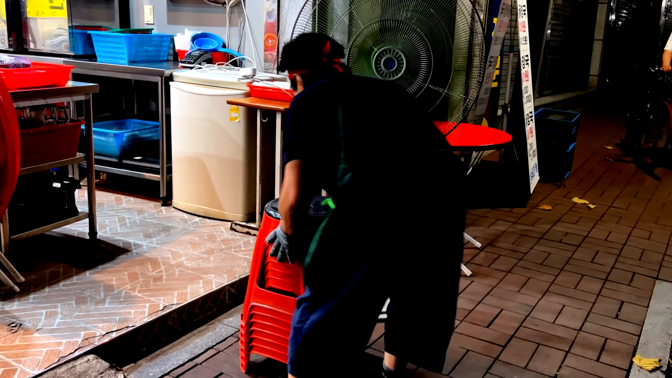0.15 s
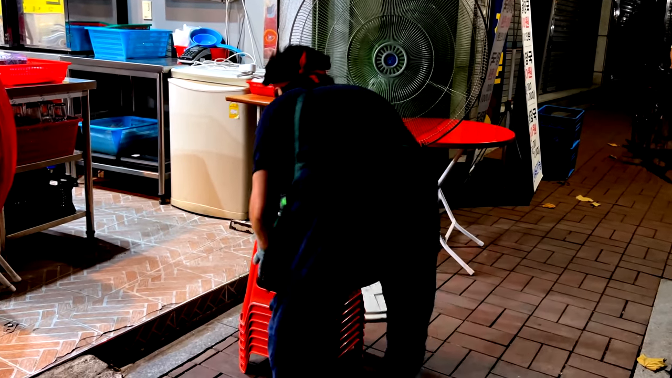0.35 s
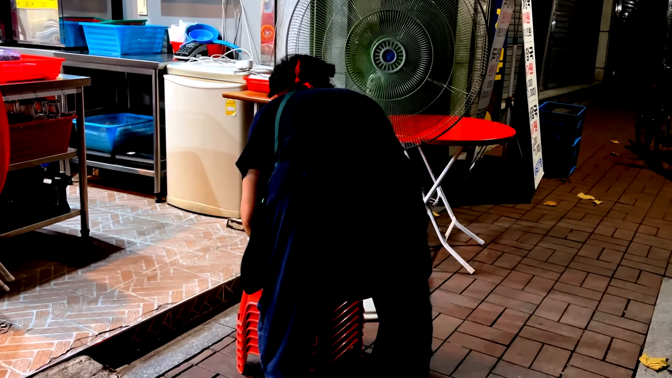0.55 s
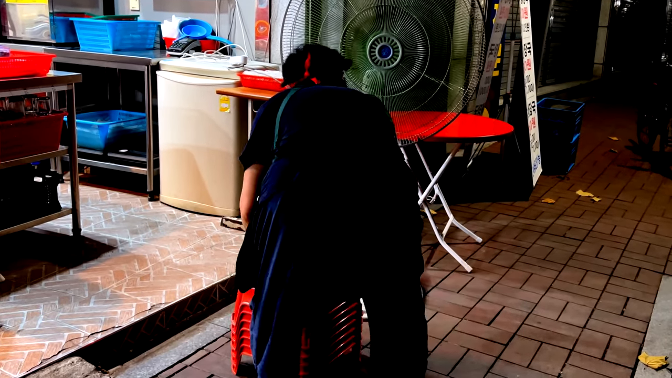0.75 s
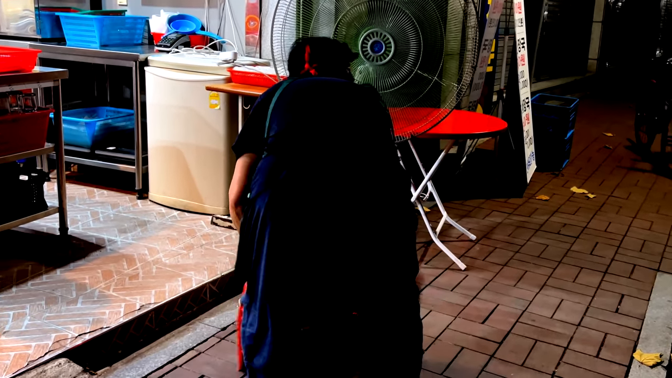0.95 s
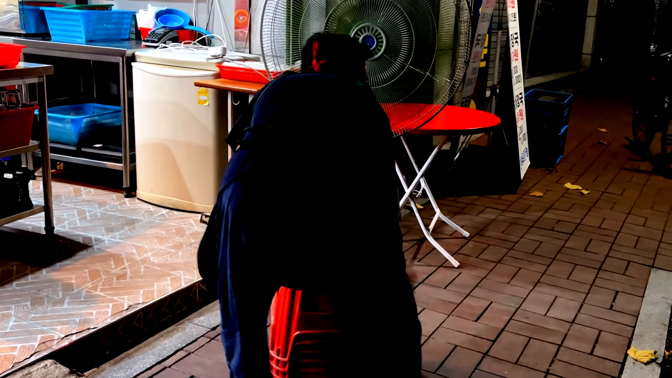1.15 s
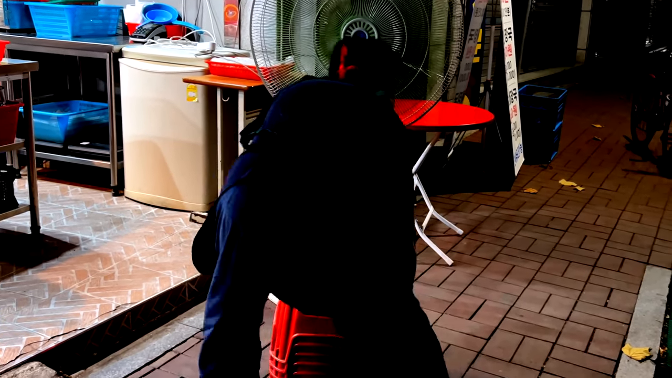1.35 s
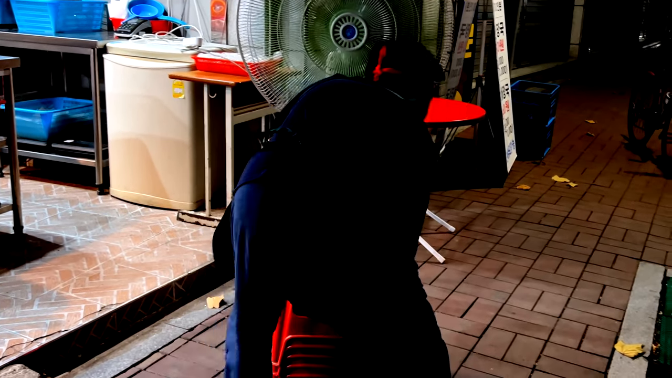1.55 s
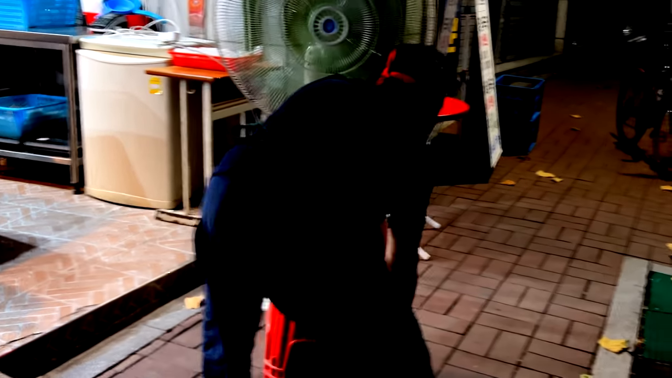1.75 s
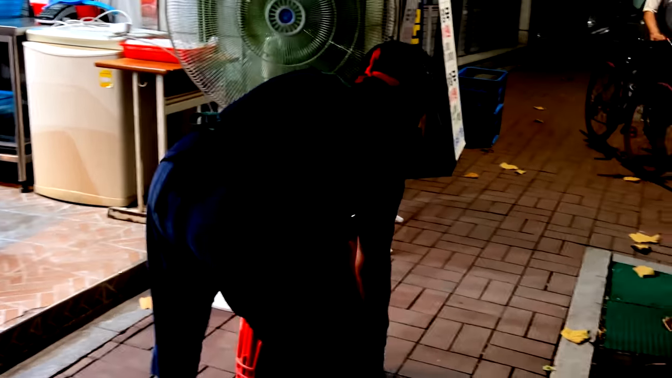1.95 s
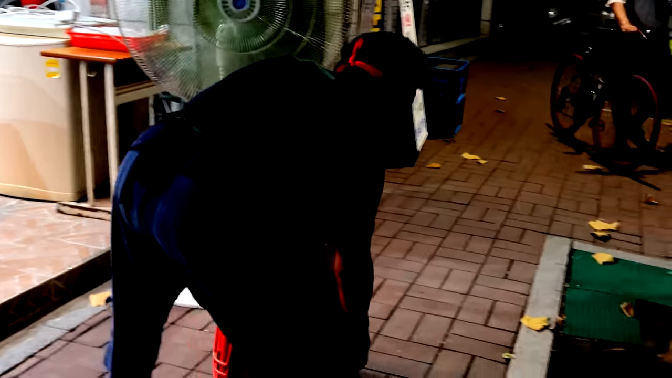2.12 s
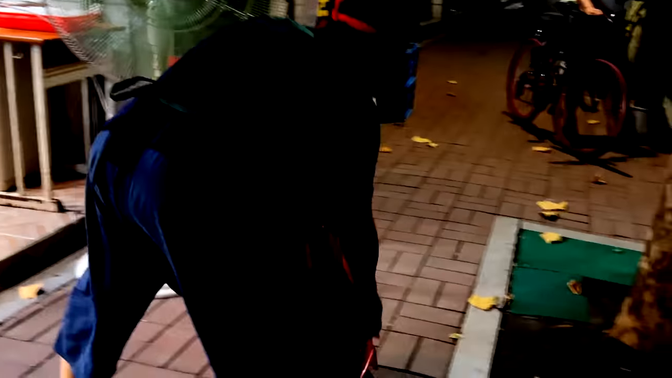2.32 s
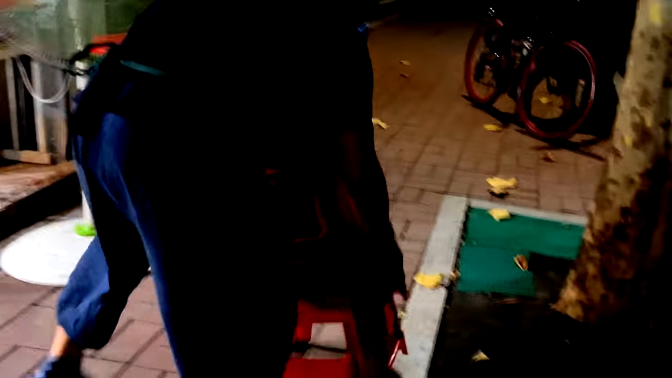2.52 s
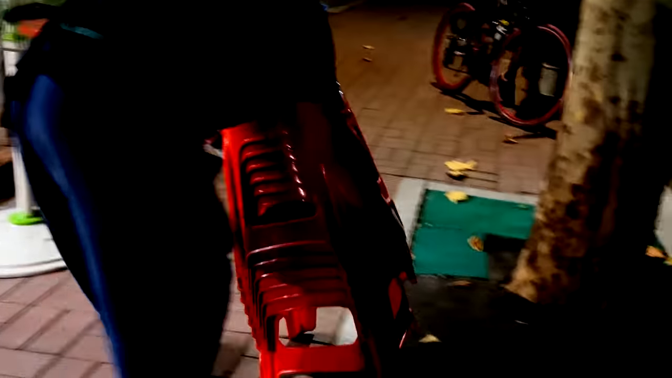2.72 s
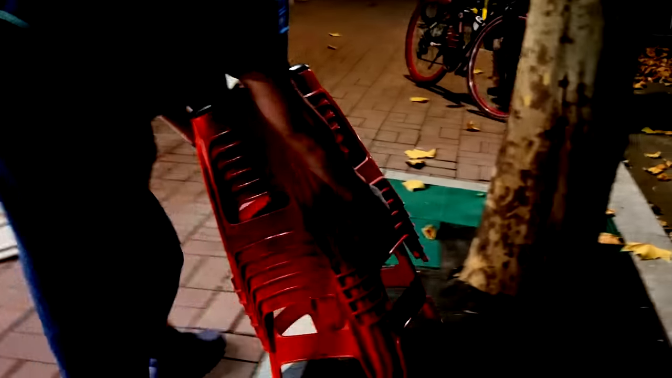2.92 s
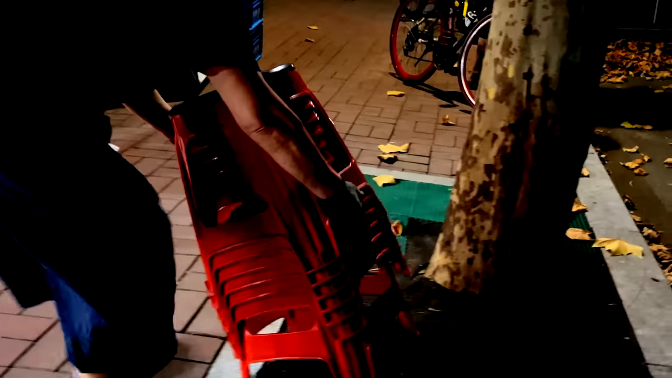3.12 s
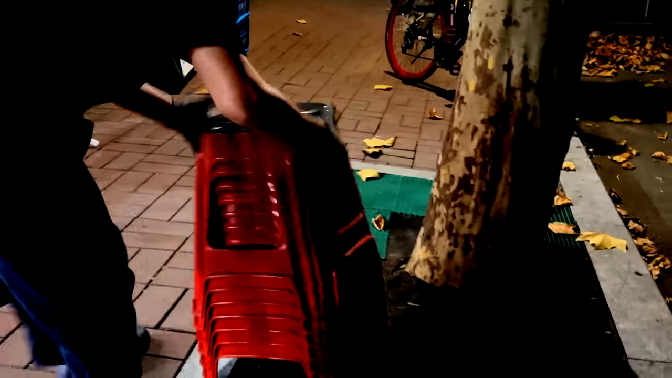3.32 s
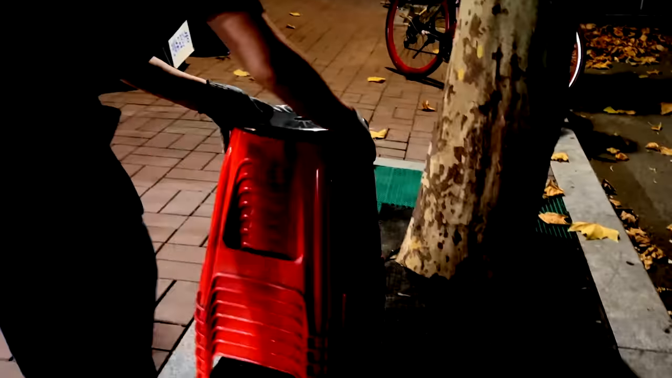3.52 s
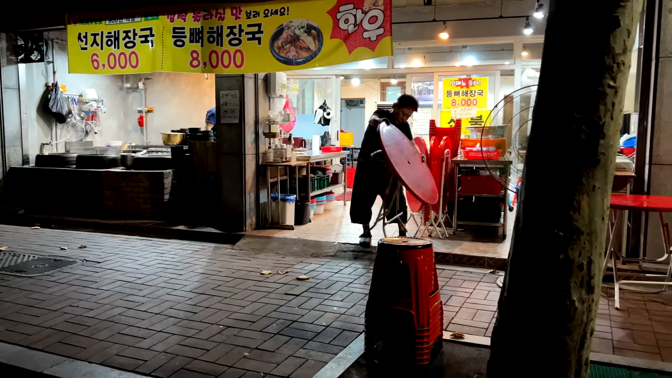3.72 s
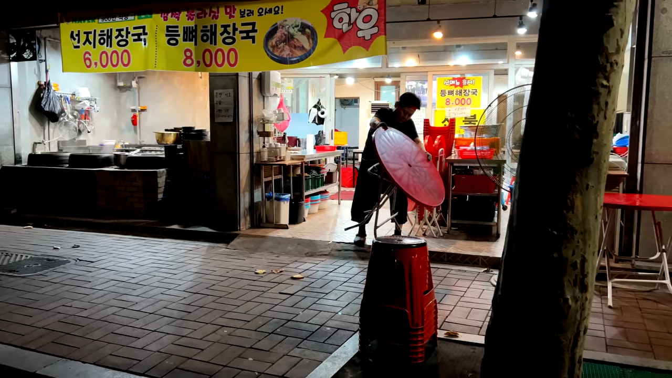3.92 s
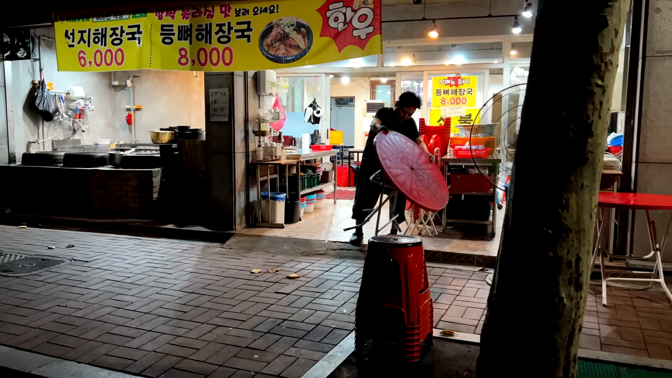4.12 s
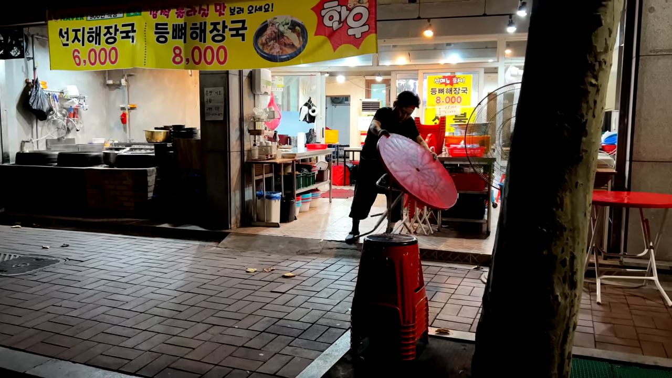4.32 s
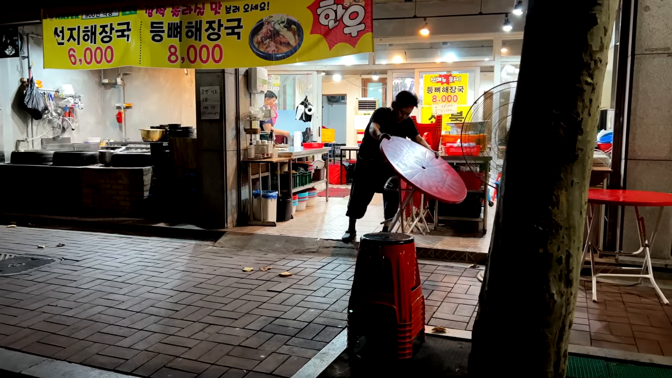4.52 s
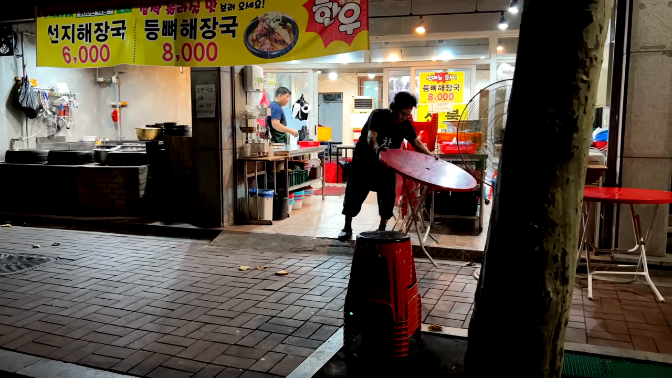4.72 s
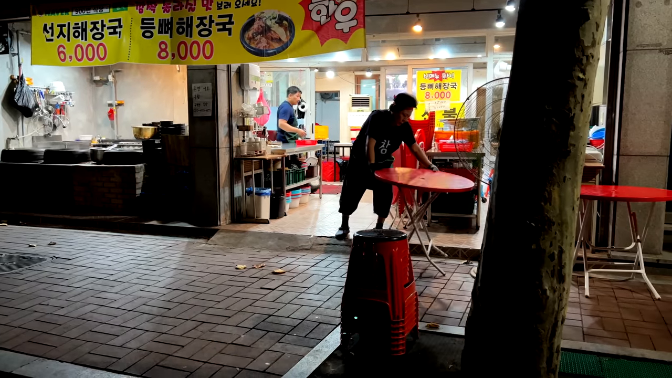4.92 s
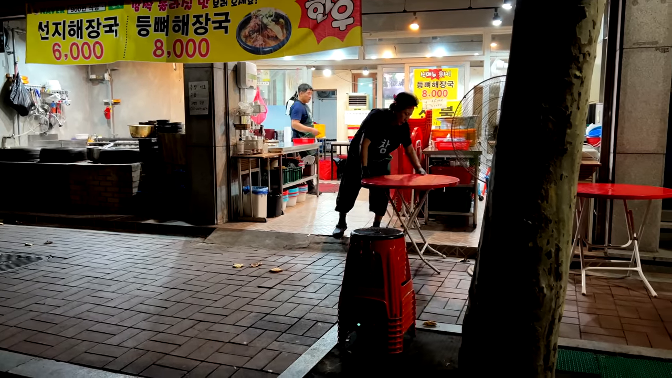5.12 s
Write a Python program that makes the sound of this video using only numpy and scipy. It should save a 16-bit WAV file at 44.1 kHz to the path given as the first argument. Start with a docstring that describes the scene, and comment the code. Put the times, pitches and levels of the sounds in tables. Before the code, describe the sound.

Plastic stools judder and knock close by amid wind thumps and fan hum, followed by a short metallic clash of table legs.

```python
"""A stack of plastic stools close on the left is dragged over brick paving outside a street kitchen:
stick-slip noise scrapes and groans, struck modes rattle, and the stack is set down hard.
A bright scuff comes near 0.46 s, then steel legs of a folding table clash as they open in the shop front:
noise bands and modes. Behind them fans hum as wavering sines and traffic murmurs as coloured noise;
puffs of wind, lumpy low noise and sinking thumps, overload the small stereo microphone."""
import sys
import numpy as np
from scipy import signal
from scipy.fft import rfft, irfft, next_fast_len
from scipy.io import wavfile
from scipy.ndimage import uniform_filter1d

SR = 44100
rng = np.random.default_rng(int(sys.argv[2]) if len(sys.argv) > 2 else 0)


def store_pcm(level_fs):
    """Save levels as 16-bit WAV."""
    pcm = np.round(np.clip(level_fs, -1, 1) * 32767).astype(np.int16)
    wavfile.write(sys.argv[1], SR, np.atleast_2d(pcm).T)


N = 227335
TIME = np.arange(N) / SR

# hollow modes of the stool stack: f/Hz, relative level/dB, t60/s
STOOL_MODES = [(154, 6, 0.02), (256.8, 3, 0.11), (287, -3.5, 0.2), (337.4, 1.5, 0.11), (368.7, 5.5, 0.088),
               (413, 6, 0.046), (477, -12, 0.08), (499, -4, 0.049), (700, -3.5, 0.062), (737, -14, 0.062),
               (900, 5, 0.026), (1030, -7, 0.042), (1300, 0, 0.065), (1435, 9.5, 0.026)]
# low spectrum of wind turbulence, also lent to the traffic rumble: f/Hz, relative level/dB
LOW_SPECTRUM = [(20, -37), (40, 0.5), (65, 4), (105, 0), (170, -3), (260, -7), (450, -25), (900, -71)]
# left-right likeness of sources near the microphone: f/Hz, correlation/1
NEAR_LIKENESS = [(60, 0.7), (300, 0.93), (700, 0.82), (1400, 0.8), (3000, 0.67), (6000, 0.76)]


def stool_drag(scrape_gain_db, judder_gain_db, grit_gain_db):
    """Feet catch and slip on the bricks, the legs judder in their low modes, sand crunches beneath."""
    # spectra of scraping feet and of crunching sand: f/Hz, relative level/dB
    scrape_spectrum = [(400, -3), (560, -1.5), (760, 4), (1030, -2.5), (1350, -16.5), (1800, -8.5),
                       (2640, -8), (3100, -21), (4000, -16), (5200, -100), (8000, -20.5), (16000, -65)]
    grit_spectrum = [(2500, -0.5), (4500, 5.5), (7000, 0.5), (9000, -12), (13000, -3), (16000, -14)]
    scraping, juddering, crunching = shove_levels()
    scrape = coloured(slips(per_s=2200, spread_db=1.5, clump_db=2.5), scrape_spectrum)
    catches = slips(per_s=350, spread_db=0.5, clump_db=2.0)
    legs = np.zeros((2, N))
    for k, (hz, db, t60) in enumerate(STOOL_MODES):
        # modes above 380 Hz are weaker; neighbours have opposite sign
        legs += ring(catches, hz, t60) * from_db(db) * min(1, 380 / hz) * (-1) ** k
    grit = coloured(slips(per_s=9200, spread_db=3.5, clump_db=3.5), grit_spectrum)
    return (scrape * scraping * from_db(scrape_gain_db)
            + rms_one(legs) * juddering * from_db(judder_gain_db)
            + grit * crunching * from_db(grit_gain_db))


def shove_levels():
    """Gains of scrape, judder and grit: a shove takes hold quickly, then the stack coasts to a stop."""
    # shoves of the stack: t/s, length/s, then relative levels/dB of scrape, leg judder and grit hiss
    shoves = [(0.767, 0.18, -26.5, -22.5, -31), (0.954, 0.098, -26, -22.5, -33),
              (1.068, 0.13, -22, -15.5, -25), (1.248, 0.13, -27, -19.5, -33),
              (1.556, 0.29, -29.5, -19, -34), (1.737, 0.12, -22.5, -17, -35),
              (1.935, 0.17, -29.5, -18.5, -34), (2.215, 0.21, -20.5, -13, -27.5),
              (2.36, 0.49, -18, -14, -30.5), (2.665, 0.17, -15.5, -7.5, -27.5),
              (2.873, 0.11, -18.5, -11, -34.5), (3.264, 0.04, -17.5, -8.5, -43),
              (3.46, 0.04, -37, -18.5, -65)]
    gains = np.zeros((3, N))
    for s, length, *levels_db in shoves:
        shove = swell(s, length, attack_s=0.0084, fall_db_per_s=206)
        gains = np.maximum(gains, from_db(levels_db)[:, None] * shove)  # the strongest shove wins
    return gains


def leg_groan(jitter, rough_db, overtone_db):
    """Sliding feet lock into an uneven stick-slip cycle that slows and fades with the stack."""
    # chattering legs: t/s, length/s, first slip rate f/Hz, level/dB at first
    groans = [(1.081, .07, 480, -23), (1.13, 0.074, 290, -23), (1.272, 0.14, 277, -13),
              (1.576, 0.058, 415, -22), (1.667, 0.044, 264, -19), (1.732, 0.034, 363, -16.5),
              (1.736, .11, 275, -17.5), (1.794, 0.046, 412, -15), (1.85, 0.056, 395, -18),
              (1.888, .06, 253, -20), (2.011, 0.051, 380, -23)]
    sag_hz_per_s, fade_db_per_s = 440, 68
    out, unsteady, rough = 0, 1 + jitter * drift(160), rough_db * drift(90)
    for s, length, hz, db in groans:
        age = np.clip(TIME - s, 0, length)
        phase = 2 * np.pi * np.cumsum((hz - sag_hz_per_s * age) * unsteady) / SR
        gain = swell(s, length, attack_s=0.025, fall_db_per_s=300)
        gain = gain * from_db(db - fade_db_per_s * age + rough)
        out = out + gain * (np.sin(phase) + from_db(overtone_db) * np.sin(2 * phase))
    return out


def stool_resonances():
    """Short rough resonances of the plastic: dense clicks of nearly even size excite one resonator each."""
    # a scuff at 0.8 s, high clatter at 2.73 s, hollow knocks near 3.45 s:
    # t/s, length/s, f/Hz, level/dB, t60/s
    resonances = [(0.8, 0.13, 1090, -22.5, 0.013), (2.385, 0.079, 1410, -33, 0.022),
                  (2.73, 0.051, 3730, -20, .014), (3.448, 0.02, 340, -13, 0.039),
                  (3.488, 0.045, 560, -22, 0.019)]
    out = np.zeros((2, N))
    for s, length, hz, db, t60 in resonances:
        arch = np.sqrt(np.sin(np.pi * np.clip((TIME - s) / length, 0, 1)) + 1e-12)
        clicks = slips(per_s=1500, spread_db=1, clump_db=1)
        out += from_db(db) * arch * rms_one(ring(clicks, hz, t60))
    return out


def stool_knocks(crack_db, modes_db, body_db, edge_db):
    """Nested stools slap together: a short crack and a panel's clack over the hollow ring of the stack."""
    # stools on each other and on the bricks: t/s, blow level/dB, relative hollow body level/dB,
    # relative sharp edge level/dB, t60/s at 1 kHz, clack f/Hz, clack level/dB relative to the blow
    knocks = [(0.776, -19, -7, -3, .049, 900, 2), (0.85, -6, -30, -12, 0.04, 1090, -8),
              (0.882, -6, -10, -9, 0.088, 1120, -9), (1.021, -11.5, -28, -12, 0.082, 900, -14),
              (1.067, -4.5, -3, -36, 0.16, 460, 2), (1.091, -15, -4, -22, 0.091, 560, 3),
              (1.113, -11.5, 8, -22, 0.1, 420, 0), (1.285, -5.5, -7, -22, 0.09, 2080, -6),
              (1.298, -6.5, -10, -20, 0.056, 2040, -2), (1.311, -9.5, -14, -22, .08, 2250, -8),
              (1.66, -17, -11, -3, 0.055, 877, -16), (2.046, -16, -3, -3.5, 0.2, 925, 0),
              (2.199, -25, 10, -2.5, 0.25, 790, -12), (2.239, -29, -4, 1, 0.13, 990, -5),
              (2.291, -7.5, -5, -30, 0.042, 745, 0), (2.383, -3, 10, -19, 0.14, 1518, -1),
              (2.405, -0.5, -1, -23, 0.072, 412, -1), (2.454, -8, 11, -34, 0.029, 864, -0.5),
              (2.551, -10, -6, -10, 0.061, 452, -1), (2.611, 4.5, -6, -40, .025, 665, 1),
              (2.7, -10.5, 4, -15, 0.045, 770, 6), (2.718, 7.5, -17, -22, 0.035, 617, -9),
              (2.739, 4.5, -19, -22, 0.036, 1080, -14), (2.751, 4, -12, -25, 0.031, 1090, -14),
              (2.764, -0.5, -17, -35, 0.071, 1280, -8), (2.806, -4.5, -8, -35, 0.043, 805, -3),
              (2.829, 5.5, -21, -22, 0.019, 768, 0), (2.845, -3.5, 1, -32, 0.03, 715, -6),
              (2.868, -14.5, 0, 1.5, 0.058, 497, 9.5), (2.899, 4.5, 4, -22, 0.048, 470, -7),
              (2.931, -2.5, -7, -21, .04, 700, -7), (2.95, -3.5, -17, -22, 0.14, 740, -3),
              (2.978, -5, -23, -14.5, 0.035, 462, -10), (2.996, 6.5, -7, -27, 0.056, 1110, -13),
              (3.018, -9.5, 3, -18, 0.12, 756, -1), (3.161, -7, -28, -24, 0.032, 1313, -0.5),
              (3.183, -7.5, -24, -19, 0.11, 774, -9), (3.209, -4.5, -8, -16, 0.16, 660, -2.5),
              (3.224, 3.5, -29, -16, 0.051, 457, -12), (3.255, 14.5, -18, -18, 0.072, 1000, -20),
              (3.265, -1, 1, -8, 0.078, 877, -8), (3.277, 3.5, 9.5, -9, 0.072, 737, 4),
              (3.497, -12.5, -5, -22, 0.092, 600, -2), (3.557, -23, 8, -16, 0.088, 450, -10)]
    # spectrum of a crack: f/Hz, relative level/dB
    knock_spectrum = [(100, -34), (220, 9), (380, 9.5), (750, 3.5), (1400, -4.5), (2600, -2.5), (4500, 1),
                      (8000, -3.5), (15000, -9.5)]

    def colour(blow, body, edge):
        tilt = [(400, body + body_db), (900, 0), (2500, 0), (6000, edge + edge_db)]
        return lambda hz: blow + at_hz(knock_spectrum, hz) + at_hz(tilt, hz)

    s, blow_db, body, edge, t60, clack_hz, clack_db = np.transpose(knocks)
    spectra = list(map(colour, blow_db, body, edge))
    crack = crashes(s, spectra, t60, damping=0.029, chatter_db=1.0, contact_s=0.00024)
    hollow = struck(s, blow_db + body / 2, STOOL_MODES, scatter_db=7.0)
    clack = panel_rings(s, blow_db + clack_db, clack_hz, cycles=20.4, detune=0.014)
    return from_db(crack_db) * crack + from_db(modes_db) * hollow + clack


def stool_rattle(crack_db, crack_t60, count=300):
    """Small cracks and clacks at random moments, growing with the scrape that shakes them loose."""
    # spectrum of a small crack: f/Hz, relative level/dB
    tick_spectrum = [(500, -19), (800, 7), (1500, 12), (2700, -11), (4300, -19), (8000, -31), (16000, -33)]
    rattles_per_s, above_scrape_db, size_spread_db = 60, -3.5, 1.5
    # below this scrape level the stools stay nested: the rattle loses this many extra dB per dB
    loose_db, extra_drop = -28, 0.4
    panel_hz, panel_spread_octaves = 890, 0.41
    gaps, sizes = rng.random((count, 2)).T
    s = np.cumsum(2 * gaps / rattles_per_s)
    shake_db = 20 * np.log10(np.interp(s, TIME, shove_levels()[0]) + 1e-9)
    shake_db = shake_db + extra_drop * np.minimum(shake_db - loose_db, 0)
    db = shake_db + above_scrape_db + size_spread_db * (2 * sizes - 1)
    heard = s < TIME[-1]
    s, db = s[heard], db[heard]
    blows = np.bincount((s * SR).astype(int), from_db(db), N)
    dying = signal.lfilter([1], [1, -from_db(-60 / (crack_t60 * SR))], blows + 1e-18)
    cracks = dying * coloured(rng.standard_normal((2, N)), tick_spectrum)
    pitches = panel_hz * 2 ** (panel_spread_octaves * rng.standard_normal(len(s)))
    return from_db(crack_db) * cracks + panel_rings(s, db, pitches, cycles=16, detune=0.12)


def panel_rings(times, levels_db, pitches, cycles, detune):
    """A thin struck panel clacks at its pitch and two overtones, losing 60 dB in the given cycles."""
    # partials of a panel: multiple of its pitch/1, relative level/dB
    panel_partials = [(1, -0.5), (1.87, -11), (3.5, -16.5)]
    out, age = np.zeros((2, N + SR)), np.arange(SR // 10) / SR
    for s, db, hz in zip(times, levels_db, pitches):
        swing = 0
        for multiple, partial_db in panel_partials:
            off_pitch = 1 + detune * rng.standard_normal((2, 1))
            wave = np.sin(2 * np.pi * hz * multiple * age * off_pitch)
            swing = swing + from_db(partial_db) * wave * rng.choice([-1, 1], (2, 1))
        start = int(s * SR)
        out[:, start:start + len(age)] += swing * from_db(db - 60 * age * hz / cycles)
    return out[:, :N]


def from_the_left(x):
    """A source on the left reaches that port a little sooner and, over most of its range, louder."""
    # level difference between the ports: f/Hz, left minus right level/dB
    stool_side = [(300, -1), (700, 1.5), (1300, 3.5), (2400, 4), (4400, 9), (9000, -2)]
    lags = np.array([[0], [0.00007]])  # s

    def gain(hz):
        balance = from_db(at_hz(stool_side, hz)) ** np.array([[.5], [-.5]])
        return balance * np.exp(-2j * np.pi * hz * lags)

    return filtered(x, gain)


def scuff_and_table_legs(crash_db):
    """A bright scuff, later clashing steel tubes that ring on, all of noise and modes; jolts drum the top."""
    # bright scuff and leg clashes: t/s, level/dB, relative low clang level/dB,
    # relative shrill top level/dB, t60/s at 1 kHz, tube ring level/dB relative to the second column
    bursts = [(0.073, -32, -8, 8, 0.18, -18), (0.459, -14, -12, 1, 0.15, -26),
              (0.466, -11, -16, 11, 0.39, -23), (0.483, -19, 2.5, 0, 0.2, -20),
              (0.518, -24.5, 1.5, 8, 0.36, -22), (4.894, -9, -2, 16, 0.23, -19.5),
              (4.902, -8.5, 4, 22.5, 0.13, -11), (4.93, -10, -6, 17, 0.41, -10),
              (4.943, -6.5, -5, 8, 0.16, -13), (4.991, -16, -0.5, -22, 0.32, -23),
              (5.037, -20.5, 1, 12, 0.99, -17.5), (5.091, -17, -1.5, 17, 0.21, -30),
              (5.133, -17.5, -0.5, 18, 0.35, -28)]
    # spectrum of scuff and clashes: f/Hz, relative level/dB
    steel_spectrum = [(100, 12), (250, 6), (450, 3.5), (1000, 5.5), (1900, 7), (3200, 2), (4400, 4),
                      (7500, -2.5), (10000, 0), (11800, -16.5), (13500, -11), (16000, -20)]
    # modes of the steel tubes, then of the round table top: f/Hz, relative level/dB, t60/s
    tube_modes = [(972, 1, .15), (1367, -7, .1), (1803, 0, .1), (3079, -7, .12), (4078, -7, .45),
                  (4190, -5, .05), (4312, -4, .13), (4520, -4, .05), (11576, -1, .2), (11750, -1, .16),
                  (12100, -3, .18), (12240, -2, .2), (12698, -3, .22), (13083, -8, .18)]
    top_modes = [(155, -8, 0.15), (225, -5, .12), (293, -8, .08), (379, -8, 0.08), (465, 0, .09),
                 (550, 0, 0.11)]
    # jolts of the top as the legs open: t/s, level/dB
    jolts = [(4.912, -24), (4.984, -20), (5.046, -24), (5.128, -26)]

    def colour(level, clang, shrill):
        tilt = [(1800, clang), (5500, 0), (9000, 0), (11500, shrill)]
        return lambda hz: level + at_hz(steel_spectrum, hz) + at_hz(tilt, hz)

    s, level_db, clang_db, shrill_db, t60, tube_db = np.transpose(bursts)
    spectra = list(map(colour, level_db, clang_db, shrill_db))
    crash = crashes(s, spectra, t60, damping=0.028, chatter_db=0.5, contact_s=0.0034)
    tubes = struck(s, level_db + tube_db, tube_modes, scatter_db=1)
    top = struck(*np.transpose(jolts), top_modes, scatter_db=3)
    return from_db(crash_db) * crash + buzzing(tubes) + top + frame_chirps()


def buzzing(x):
    """Loose joints buzz, so that the ringing steel shakes in level."""
    buzz_per_s, buzz_db = 220, 4.5
    return x * from_db(buzz_db * (drift(buzz_per_s) + 0.5))


def frame_chirps():
    """A dry joint rubs as the frame is carried: a soft, high chirp that swells and fades."""
    # chirps: t/s at the height, width/s, level/dB
    chirps = [(3.82, .04, -44), (4.23, .035, -51)]
    # resonances of the joint: f/Hz, relative level/dB, t60/s
    chirp_modes = [(6600, -2, .003), (7170, -3, .025), (7480, -5, .015), (8100, -6, .003),
                   (12700, -3, .003)]
    rubbing = slips(per_s=6000, spread_db=1, clump_db=1)
    singing = rms_one(sum(from_db(db) * rms_one(ring(rubbing, hz, t60)) for hz, db, t60 in chirp_modes))
    return singing * sum(from_db(db) / np.cosh((TIME - s) / width * np.sqrt(2)) for s, width, db in chirps)


def hinge_groan(jitter, rough_db, overtone_db):
    """The stiff hinge slips in a rough cycle whose pitch follows the swinging top, which radiates it."""
    # course of the groan: t/s, f/Hz, level/dB
    hinge = [(4.905, 390, -30), (4.924, 315, -12), (4.945, 260, -18), (4.964, 255, -29), (4.99, 285, -12.5),
             (5.025, 265, -20), (5.05, 295, -18), (5.07, 385, -16), (5.085, 420, -45), (5.098, 400, -20),
             (5.118, 320, -21), (5.13, 300, -42)]
    hz, db = in_time(hinge)
    phase = 2 * np.pi * np.cumsum(hz * (1 + jitter * drift(160))) / SR
    return from_db(db + rough_db * drift(130)) * (np.sin(phase) + from_db(overtone_db) * np.sin(2 * phase))


def wind(edge_s):
    """Each puff pushes lumps of low turbulence into the microphone ports."""
    # puffs: t/s, level/dB, length/s
    puffs = [(2.131, -9, .135), (2.359, -8, .095), (2.47, -15, .19), (2.765, -11, .04), (2.864, -3, .05),
             (2.95, -17, .15), (3.29, -20, .08), (3.44, -20, .10), (3.60, -21, .06), (4.445, -32, .06),
             (4.633, -20, .11), (4.745, -19, .04), (4.79, -24, .05), (4.975, -18, .06), (5.105, -18, .05)]
    lumps_per_s, lump_db = 40, 2.2
    force = sum(from_db(db) * swell(s, length, edge_s, fall_db_per_s=364) for s, db, length in puffs)
    eddies = stereo(coloured(rng.standard_normal((2, N)), LOW_SPECTRUM), NEAR_LIKENESS)
    # even out the chance level over about 20 ms
    eddies /= np.sqrt(uniform_filter1d(np.mean(eddies ** 2, axis=0), size=900) + 1e-6)
    return from_db(lump_db * drift(lumps_per_s)) * force * eddies


def thumps():
    """A hard buffet rocks both ports for a few cycles of sinking pitch."""
    # hardest buffets: t/s, level/dB, first f/Hz
    buffets = [(2.141, 5, 152), (2.179, 9, 95), (2.224, 2, 107), (2.259, 1, 76), (2.364, 0.5, 124),
               (2.386, -6, 105), (2.408, -7.5, 162), (2.429, -2, 118), (2.639, -1, 76), (2.777, 1.5, 73.4),
               (2.867, 6, 104), (2.886, 7, 192), (2.901, -4, 120), (2.929, -7, 95), (4.638, -7, 168),
               (4.769, -6.5, 81), (5.009, -5.5, 130)]
    rise_s, sag_octaves_per_s = 0.0072, 4.2
    out, age = np.zeros((2, N + SR)), np.arange(SR // 10) / SR
    shape = (age / rise_s * np.exp(1 - age / rise_s)) ** 2
    for s, db, hz in buffets:
        turns = np.cumsum(hz * 2 ** (-sag_octaves_per_s * age)) / SR
        turns = turns + rng.random() + 0.086 * rng.standard_normal((2, 1))  # ports slightly out of step
        start = int(s * SR)
        out[:, start:start + len(age)] += from_db(db) * shape * np.sin(2 * np.pi * turns)
    return out[:, :N]


def street(kitchen_gain_db, shop_gain_db, wander):
    """Fans and traffic; the kitchen side crossfades to the shop front, each with a hum of its own."""
    # background spectra by the kitchen and by the shop front: f/Hz, relative level/dB
    kitchen_spectrum = [(25, -43), (62, 6.5), (90, -19), (180, -9), (370, -7), (550, -13.5), (1000, -11.5),
                        (1400, -15.5), (2700, -19.5), (3600, -24.5), (5300, -26.5), (8500, -40.5),
                        (12500, -37), (15500, -41)]
    shop_spectrum = [(25, -23), (60, -11.5), (110, -11), (230, -1.5), (420, -5.5), (520, -11.5),
                     (950, -7.5), (1300, -10.5), (2050, -12.5), (2900, -23), (5700, -29.5), (9000, -37),
                     (12500, -34.5), (15500, -43)]
    # traffic rumble, then hum of the big fan: t/s, level/dB
    rumble_level = [(0, -29), (.6, -31), (1.2, -25.5), (2.0, -22), (3.0, -38), (3.68, -14)]
    hum_level = [(0, -24.5), (.15, -19), (.32, -30.5), (.75, -26), (1.05, -27.5), (1.65, -21.5), (2.2, -25),
                 (3.68, -28)]
    # partials of the big fan, then of the shop's fans and coolers: f/Hz, level/dB
    fan_hum = [(60, -19), (124, -1), (246, -12.5)]
    shop_hum = [(235, -38), (361, -43), (931, -48), (996, -47), (1970, -53)]
    # turn towards the shop front: t/s, share of power/1
    to_shop = [(3.42, 0.004), (3.68, 0.94)]
    # left-right likeness of the street: f/Hz, correlation/1
    diffuse_likeness = [(60, 0.81), (130, 0.84), (290, 0.66), (640, 0.32), (1400, 0), (3000, 0.22),
                        (6000, 0)]

    def noise(spectrum):
        return coloured(rng.standard_normal((2, N)), spectrum)

    at_shop = np.clip(np.interp(TIME, *np.transpose(to_shop)), 0, 1)
    rumble = from_db(in_time(rumble_level)[0]) * noise(LOW_SPECTRUM)
    kitchen = from_db(-23.5 + kitchen_gain_db) * noise(kitchen_spectrum) + rumble
    shop = from_db(-28 + shop_gain_db) * ebbing(noise(shop_spectrum))
    big_fan = from_db(in_time(hum_level)[0]) * humming(fan_hum, wander)
    kitchen_side = stereo(kitchen, diffuse_likeness) + big_fan
    shop_side = stereo(shop, diffuse_likeness) + humming(shop_hum, wander=2.3)
    return np.sqrt(1 - at_shop) * kitchen_side + np.sqrt(at_shop) * shop_side


def humming(partials, wander):
    """Partials of a motor's hum, wavering in level and phase."""
    waver_db, wavers_per_s = 3.4, 11
    out = 0
    for hz, db in partials:
        level = from_db(db + waver_db * drift(wavers_per_s))
        out = out + level * np.sin(2 * np.pi * hz * TIME + wander * drift(7.9))
    return out


def ebbing(x):
    """Every octave of a noise ebbs and swells by chance on its own."""
    ebb_db, ebbs_per_s = 2, 9
    centres = np.geomspace(125, 4000, 6)
    out = 0
    for centre in centres:
        octave = np.c_[centres, centres == centre]  # 1 at this centre, 0 at the others
        out = out + filtered(x, lambda hz: at_hz(octave, hz)) * from_db(ebb_db * drift(ebbs_per_s))
    return out


def street_echo(x, t60, wall_hz):
    """Shop fronts send back a dull, diffuse tail after a short gap."""
    age = np.arange(SR) / SR
    build_up = np.clip(age / .012 - .5, 0, 1)  # silent for 6 ms, full at 18 ms
    tail = rng.standard_normal((2, SR)) * from_db(-60 * age / t60) * build_up
    tail /= np.sqrt(np.sum(tail ** 2) / 2)
    dull = signal.butter(1, min(wall_hz, .4 * SR), fs=SR, output="sos")
    return signal.sosfilt(dull, signal.fftconvolve(x, tail, axes=1)[:, :N])


def crashes(times, spectra, t60s, damping, chatter_db, contact_s):
    """Dense, unresolved modes of each blow: chattering noise whose treble builds later and dies sooner."""
    out, edges = np.zeros((2, N + SR)), np.geomspace(90, 17000, 19)
    age, centres = np.arange(SR // 2) / SR, np.sqrt(edges[1:] * edges[:-1])
    white = rng.standard_normal((2, 2, N)) * from_db(chatter_db * drift(350))
    for k, hz in enumerate(centres):
        power = np.zeros(N + SR)
        build_up = np.minimum(age / contact_s / max(1, hz / 3000), 1)
        for s, spectrum, t60 in zip(times, spectra, t60s):
            life = max(t60, .01) * (1000 / hz) ** damping
            decay = np.exp(-2 * np.log(1000) * age / life)
            start = int(s * SR)
            power[start:start + len(age)] += from_db(2 * spectrum(hz)) * decay * build_up
        band = signal.butter(2, edges[k:k + 2], "band", fs=SR, output="sos")
        level = np.sqrt(power[:N]) * from_db(2.2 * drift(110))
        out[:, :N] += signal.sosfilt(band, white[k % 2] * level + 1e-18)  # neighbours use unrelated noise
    return out[:, :N]


def struck(times, levels_db, modes, scatter_db):
    """Every blow rings all modes of a body, each with a strength and a direction of its own."""
    out, at = np.zeros((2, N)), (np.asarray(times) * SR).astype(int)
    for hz, mode_db, t60 in modes:
        clicks, chance = np.zeros((2, N)), rng.standard_normal((len(at), 3)).T
        clicks[:, at] = from_db(levels_db + mode_db + scatter_db * chance[0]) * np.sign(chance[1:])
        out += ring(clicks, hz, t60)
    return out


def slips(per_s, spread_db, clump_db):
    """Two trains of stick-slip clicks of uneven size that come in clumps; rms 1."""
    sizes = from_db(spread_db * np.minimum(rng.exponential(1, (2, N)), 4)) * rng.choice([-1, 1], (2, N))
    return rms_one(sizes * (rng.random((2, N)) < per_s / SR) * from_db(clump_db * drift(70)))


def ring(clicks, hz, t60):
    """A resonator: a unit click sets a decaying sine of first height 1 ringing."""
    r, w = from_db(-60 / (t60 * SR)), 2 * np.pi * hz / SR
    return signal.lfilter([0, np.sin(w)], [1, -2 * r * np.cos(w), r * r], clicks + 1e-18)


def swell(s, length, attack_s, fall_db_per_s):
    """Attack, hold and release, as a gain."""
    return np.clip((TIME - s) / attack_s, 0, 1) * from_db(-fall_db_per_s * np.maximum(TIME - s - length, 0))


def drift(rate):
    """Chance knots of spread 1, the given number per second, joined by straight lines."""
    knots = rng.standard_normal(2000)
    return np.interp(TIME * rate, np.arange(len(knots)), knots)


def stereo(pair, likeness):
    """Mix two unrelated signals to left and right with a given likeness per frequency."""
    def mid_side_gain(hz):
        alike = np.clip(at_hz(likeness, hz), -1, 1)
        return np.sqrt([(1 + alike) / 2, (1 - alike) / 2])

    mid, side = filtered(pair, mid_side_gain)
    return np.array([mid + side, mid - side])


def coloured(x, spectrum):
    """Give a signal a spectrum that falls away below its first point; rms 1."""
    low_hz = spectrum[0][0]
    return rms_one(filtered(x, lambda hz: from_db(at_hz(spectrum, hz)) * np.minimum(hz / low_hz, 1) ** 2))


def filtered(x, gain):
    """Apply a smooth response, given as a function of frequency."""
    size = next_fast_len(N + 4096)
    return irfft(rfft(x, size) * gain(np.arange(size // 2 + 1) * SR / size), size)[..., :N]


def at_hz(points, hz):
    """Read a table on a log-frequency axis."""
    f, value = np.transpose(points)
    return np.interp(np.log(np.maximum(hz, 1)), np.log(f), value)


def in_time(rows):
    """Join the rows of a curve by straight lines; -99 outside, which silences a level in dB."""
    s, *columns = np.transpose(rows)
    return [np.interp(TIME, s, c, left=-99, right=-99) for c in columns]


def from_db(db):
    """Decibels to gain."""
    return 10 ** (np.asarray(db) / 20)


def rms_one(x):
    """Scale to unit rms."""
    return x / np.sqrt(np.mean(x ** 2) + 1e-20)


def scene():
    """Stools, scuff and table with their echoes, in the street air."""
    # left-right likeness of the scuff and the table: f/Hz, correlation/1
    table_likeness = [(60, 0.021), (300, 1), (700, 1), (1400, 0.72), (3000, 0.74), (4500, -0.024),
                      (6000, -0.55)]
    drag = stool_drag(scrape_gain_db=-0.5, judder_gain_db=-5.0, grit_gain_db=-2.5) + stool_resonances()
    knocks = stool_knocks(crack_db=0.5, modes_db=-23.0, body_db=-6.5, edge_db=2.5)
    rattle = stool_rattle(crack_db=1.5, crack_t60=0.021)
    groan = leg_groan(jitter=0.0778, rough_db=2.5, overtone_db=-12.5)
    stools = from_the_left(stereo(drag + knocks + rattle, NEAR_LIKENESS) + groan)
    steel = stereo(scuff_and_table_legs(crash_db=1.0), table_likeness)
    table = steel * from_db([[.5], [-.5]])  # a touch to the left
    table = table + hinge_groan(jitter=0.048, rough_db=0.5, overtone_db=-12)
    echo = street_echo(from_db(-10.0) * stools + from_db(-5.0) * table, t60=0.2, wall_hz=6900)
    air = wind(edge_s=0.0022) + thumps()
    background = street(kitchen_gain_db=-0.03, shop_gain_db=-0.44, wander=0.65)
    return stools + table + echo + air + background


def microphone(x, split_hz):
    """Above the split both channels hear the same sound, the left one a port spacing later."""
    lags = np.array([[.000148], [0]])  # s

    def share(hz):
        return 1 / (1 + (split_hz / (hz + 1)) ** 16)

    top = filtered(x[0], lambda hz: np.sqrt(share(hz)) * np.exp(-2j * np.pi * hz * lags))
    return filtered(x, lambda hz: np.sqrt(1 - share(hz))) + top


def record(dry):
    """Microphone ports, overload and the cut at the top."""
    x = microphone(dry, split_hz=7020)
    x = x / (1 + x ** 8) ** (1 / 8)  # overload: bends only near full scale
    return signal.sosfilt(signal.cheby2(16, 60, 16200, fs=SR, output="sos"), x)  # 60 dB down at 16.2 kHz


dry = scene()
out = record(dry)
store_pcm(out)
```